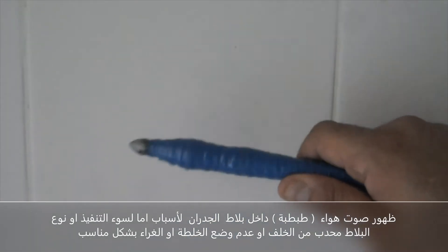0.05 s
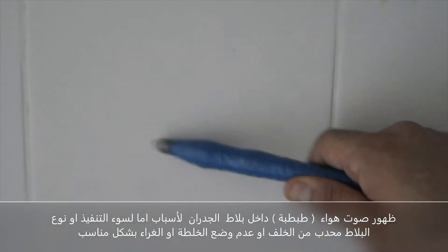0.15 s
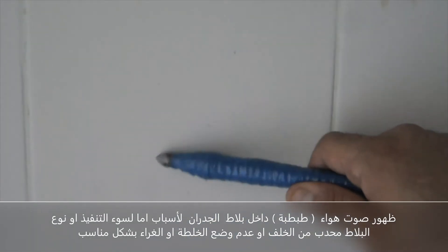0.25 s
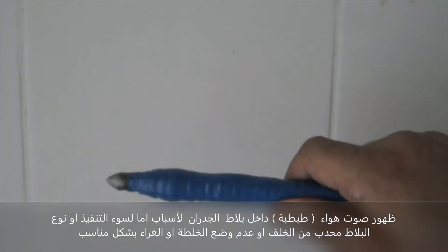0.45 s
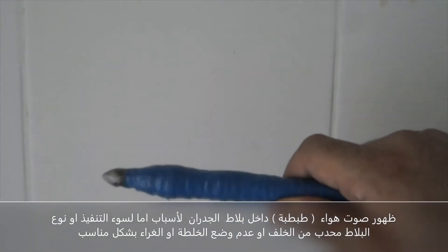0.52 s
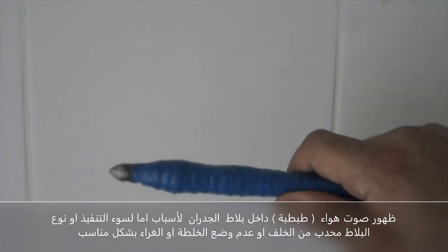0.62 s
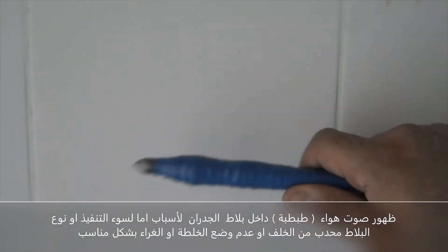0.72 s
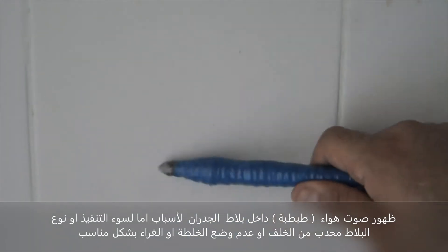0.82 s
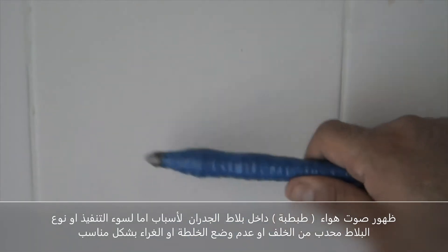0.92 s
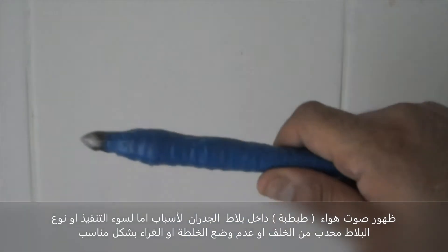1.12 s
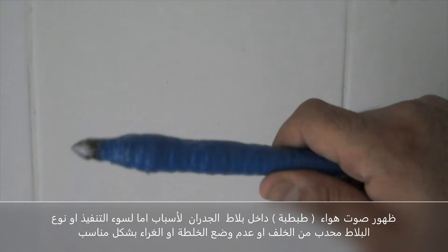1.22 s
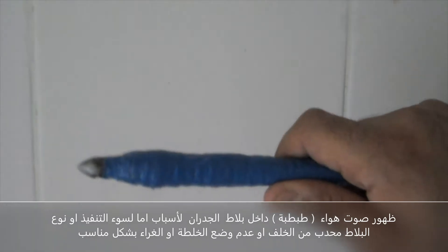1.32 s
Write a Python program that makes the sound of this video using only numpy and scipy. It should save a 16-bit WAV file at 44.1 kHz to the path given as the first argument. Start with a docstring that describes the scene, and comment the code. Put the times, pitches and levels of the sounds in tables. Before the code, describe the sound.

Two sharp knocks of a tool on ceramic tile, each with a short, ringing echo.

```python
"""A hard-tipped tool taps a hollow ceramic wall tile twice, rebounding once after each tap.
Each contact is a sharp click and a short ring of the tile; near walls and a small tiled room answer.
The echo of an earlier tap is still fading at the start. Underneath lie dull room air, a faint hum,
a deep rumble and one soft handling rub."""
import sys
import numpy as np
from scipy import signal
from scipy.fft import rfft, irfft, next_fast_len
from scipy.io import wavfile
from scipy.ndimage import map_coordinates

SR = 44100
rng = np.random.default_rng(int(sys.argv[2]) if len(sys.argv) > 2 else 0)


def store_wav(level_fs):
    """Save 16-bit WAV to argv[1]."""
    pcm = np.round(np.clip(np.atleast_2d(level_fs), -1, 1) * 32767)
    wavfile.write(sys.argv[1], SR, pcm.T.astype(np.int16))


N = 59535
TOP_HZ = 11000  # upper edge of the sound


def amp(db):
    """Decibels to gain."""
    return 10 ** (np.asarray(db) / 20)


def unit(x):
    """Scale to rms 1."""
    return x / np.sqrt(np.mean(x ** 2) + 1e-20)


def along(points, hz):
    """Read (Hz, value) points on a log frequency axis."""
    f, v = np.transpose(points)
    return np.interp(np.log(hz + 1), np.log(f + 1), v)


def filtered(x, response):
    """Shape x with a frequency response."""
    size = next_fast_len(len(x) + SR // 4)
    return irfft(rfft(x, size) * response(np.fft.rfftfreq(size, 1 / SR)), size)[:len(x)]


def causal(x, colour_db, size=2048):
    """Minimum-phase EQ: colour x without ringing ahead of its attack."""
    cepstrum = irfft(colour_db(np.fft.rfftfreq(size, 1 / SR)) * np.log(10) / 20)
    cepstrum[1:size // 2] *= 2
    cepstrum[size // 2 + 1:] = 0
    return signal.fftconvolve(x, irfft(np.exp(rfft(cepstrum))))[:len(x)]


def add(track, s, x):
    """Mix x into the track at s seconds."""
    part = track[max(0, int(round(s * SR))):][:len(x)]
    part += x[:len(part)]


def wobble(rate):
    """A smooth random curve, rate knots a second."""
    return map_coordinates(rng.standard_normal(64), [np.arange(N) * rate / SR], mode="mirror")


def wavering_tone(hz, drift_rate):
    """A sine of rms 1 whose phase wanders."""
    return np.sqrt(2) * np.sin(2 * np.pi * (hz * np.arange(N) / SR + rng.random()) + wobble(drift_rate))


def tile_contact(tilt_db_per_octave, ring_db):
    """The hard tip meets the tile: a click, a brief crack and the ring of the tile's modes."""
    # EQ of the tip's click. Each row: frequency in Hz, gain in dB.
    click_eq = [(300, -43.5), (700, -24.5), (1100, -6), (1700, -34.5), (2700, 5.5), (4000, 3), (5600, 3.5),
                (8000, 1), (9400, -5), (10500, -2)]
    # Tile modes, the lowest with a quick and a lingering part.
    # Each row: frequency in Hz, level in dB, time to fall 60 dB in seconds.
    modes = [(2253, -13.5, 0.042), (2226, -35.5, 0.47), (4980, -27, 0.017), (5546, -18.5, 0.015),
             (5700, -22, 0.018), (7580, -35, 0.0089), (8500, -26, .012), (10100, -32.5, 0.011)]
    click_db, crack_db, crack_t60_s = 8.5, -23, 0.008
    pivot_hz, spread_s = 4000, 0.000333
    t = np.arange(SR // 8) / SR
    click = amp(click_db) * (t == 0)
    crack = amp(crack_db - 60 * t / crack_t60_s) * rng.standard_normal(len(t))
    ring = sum(amp(ring_db + db - 60 * t / t60) * np.cos(2 * np.pi * hz * t) for hz, db, t60 in modes)
    ring[0] *= 0.5
    hit = causal(click + crack, lambda hz: along(click_eq, hz)) + ring
    hit = causal(hit, lambda hz: tilt_db_per_octave * np.log2(np.maximum(hz / pivot_hz, 0.25)))
    # Bending waves carry the treble fastest: the bass lands up to spread_s later.
    delay_s = lambda hz: spread_s * np.maximum(1 - hz / TOP_HZ, 0)
    return filtered(hit, lambda hz: np.exp(-2j * np.pi * np.cumsum(delay_s(hz)) * hz[1]))


def tiled_room(x):
    """Direct sound, slaps from the near walls and a diffuse tail that builds up and dies."""
    # Decay of the tail. Each row: frequency in Hz, time to fall 60 dB in seconds.
    decay = [(500, 0.32), (2200, 0.36), (5500, 0.37), (10000, 0.34)]
    # EQ of the tail. Each row: frequency in Hz, gain in dB.
    tail_eq = [(300, 5), (1500, -2.5), (2250, -7), (2700, -4.5), (4500, 3.5), (5600, -0.5), (7500, 2),
               (9400, -4), (10500, -3.5)]
    # Wall slaps. Each row: delay in seconds, level in dB.
    slaps = [(.0023, -12.5), (.0037, -10), (.0069, -20), (.0102, -15.5)]
    tail_db, build_s = -1.5, 0.007
    hz, t, noise = signal.stft(rng.standard_normal(SR * 3 // 5), SR, nperseg=256)
    tail = signal.istft(noise * amp(-60 * t / along(decay, hz)[:, None]), SR, nperseg=256)[1]
    tail *= 1 - np.exp(-(np.arange(len(tail)) / SR / build_s) ** 2)
    response = causal(amp(tail_db) * tail / np.linalg.norm(tail), lambda hz: along(tail_eq, hz))
    response[0] += 1  # direct sound
    for delay, db in slaps:
        add(response, delay, amp([db]))
    return signal.fftconvolve(x, response)


def taps():
    """One tap just before the start, then two taps with a softer rebound each, all in the room."""
    # Contacts. Each row: start in seconds, level in dB, brightness in dB per octave, ring gain in dB.
    contacts = [(-0.1, 2.5, -1, 2.5), (0.2046, -0.5, 1, 0.5), (0.2383, -11.5, -1.5, 2.5),
                (0.8148, -3.5, 0, 1.5), (0.8615, -14, -0.5, 1)]
    preroll = SR // 4
    track = np.zeros(preroll + N)
    for start, db, tilt, ring_db in contacts:
        add(track, preroll / SR + start, amp(db) * tiled_room(tile_contact(tilt, ring_db)))
    return track[preroll:]


def room_air(level_db=-42.5):
    """A steady bed of dull noise."""
    # Spectrum of the air. Each row: frequency in Hz, relative density in dB.
    spectrum = [(20, -6.5), (48, -9), (75, -6), (125, -3), (200, -11.5), (270, -7.5), (500, -15),
                (900, -15.5), (1500, -21.5), (2800, -29.5), (5000, -39), (10500, -48.5)]
    return amp(level_db) * unit(filtered(rng.standard_normal(N), lambda hz: amp(along(spectrum, hz))))


def hum(swell_db=4.5, swell_rate=14.36):
    """Three faint low tones, each fluttering in level and pitch."""
    # Hum tones. Each row: frequency in Hz, rms level in dB.
    tones = [(59, -50.5), (145, -55), (246, -53)]
    track = np.zeros(N)
    for hz, db in tones:
        flutter = amp(swell_db * wobble(swell_rate))
        track += amp(db) * unit(flutter * wavering_tone(hz, drift_rate=9.76))
    return track


def rumble():
    """A sub-bass tone that swells and sinks."""
    # Rumble envelope. Each row: time in seconds, level in dB.
    envelope = [(0, -51), (.25, -44.5), (.45, -46.5), (.6, -36.5), (0.801, -57), (1.0, -45.5), (1.13, -56),
                (1.25, -35), (1.35, -44)]
    swell = amp(np.interp(np.arange(N) / SR, *np.transpose(envelope)))
    return swell * wavering_tone(hz=29.5, drift_rate=2)


def handling_rub(peak_s=0.17, rise_s=0.14, fall_s=0.056, level_db=-43):
    """A soft, hollow rub: resonant noise swells into the first of the two taps."""
    # Resonances of the rub. Each row: centre in Hz, width in Hz, relative level in dB.
    resonances = [(500, 70, -6.5), (728, 61, -1.5), (1020, 160, -6.5), (2610, 3100, -27)]
    body = lambda f: sum(amp(db) / (1 + (2 * (f - hz) / width) ** 2) for hz, width, db in resonances)
    t = np.arange(N) / SR - peak_s
    swell = np.exp(-(t / np.where(t < 0, rise_s, fall_s)) ** 2)
    return amp(level_db) * swell * unit(filtered(rng.standard_normal(N), body))


def level_dips(mix):
    """The level dips briefly in the echoes while the tile's bands ring on."""
    # Dips. Each row: centre in seconds, half length in seconds, deepest gain in dB.
    dips = [(0.28, 0.0067, -10.5), (0.365, 0.0079, -5.5), (0.897, 0.017, -6)]
    # Bands that ring through. Each row: centre in Hz, half width in Hz.
    spared = [(2240, 140), (5200, 750)]
    t = np.arange(N) / SR
    dip_db = sum(db * np.exp(-((t - s) / half) ** 2) for s, half, db in dips)
    ringing = filtered(mix, lambda f: sum(np.exp(-((f - hz) / half) ** 2) for hz, half in spared))
    return ringing + amp(dip_db) * (mix - ringing)


def scene():
    """The taps up front, over air, hum, rumble and rub, in mono."""
    return level_dips(taps() + room_air() + hum() + rumble() + handling_rub())[None]


def record(dry):
    """A steep low-pass shaves off the top treble."""
    slope_hz = TOP_HZ + np.array([-500, 0, 1000, 1500])
    lowpass = lambda hz: amp(np.interp(hz, slope_hz, [0, -17, -58, -90]))
    return np.array([filtered(x, lowpass) for x in dry])


dry = scene()
out = record(dry)
store_wav(out)
```